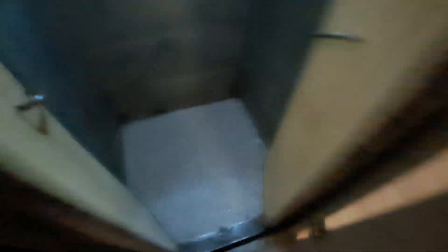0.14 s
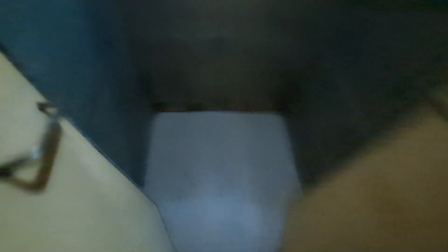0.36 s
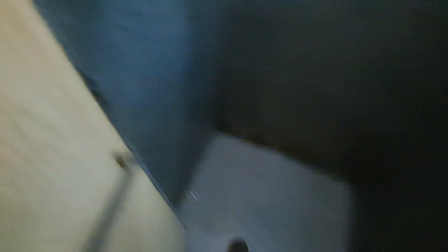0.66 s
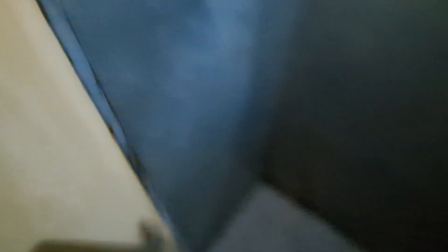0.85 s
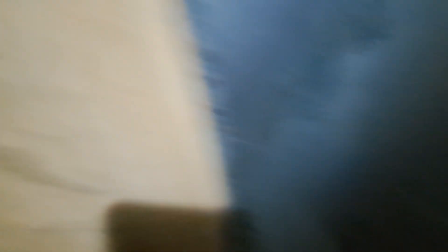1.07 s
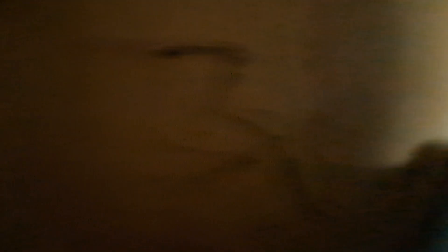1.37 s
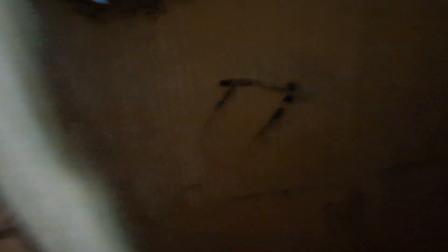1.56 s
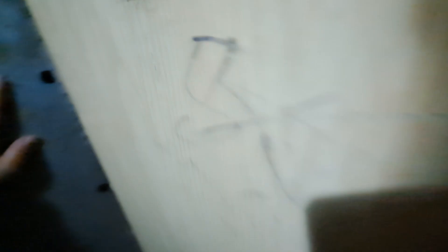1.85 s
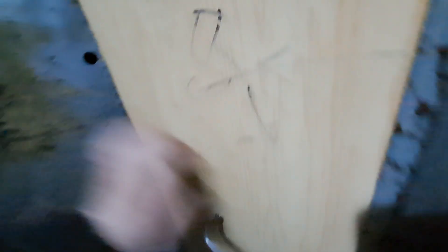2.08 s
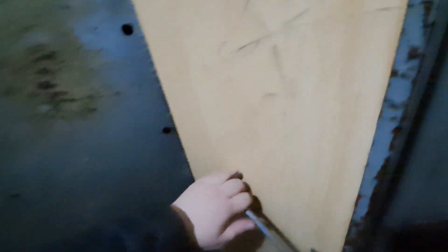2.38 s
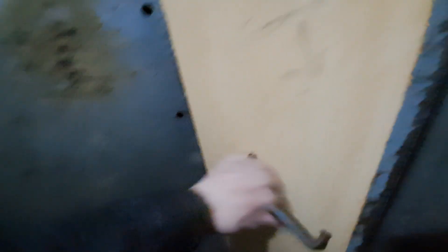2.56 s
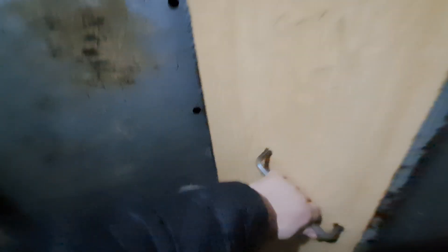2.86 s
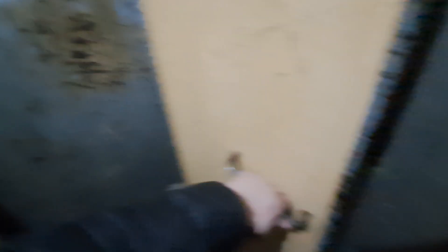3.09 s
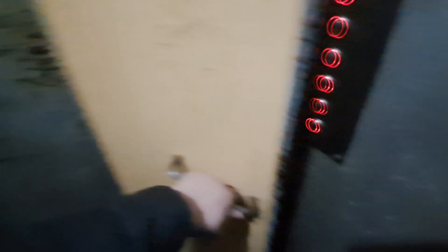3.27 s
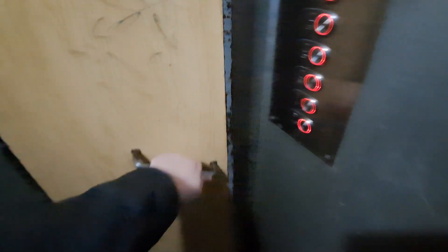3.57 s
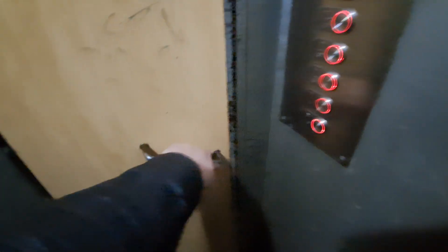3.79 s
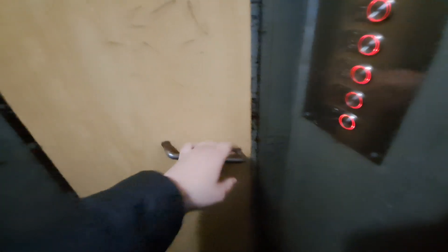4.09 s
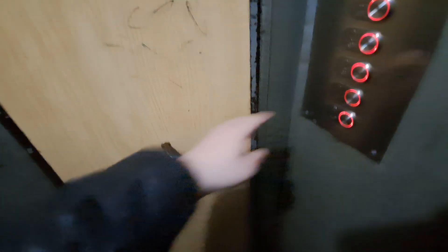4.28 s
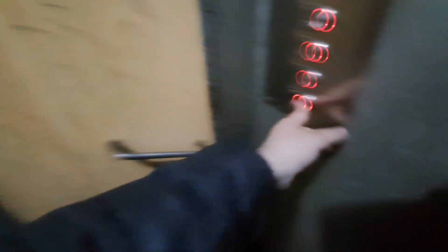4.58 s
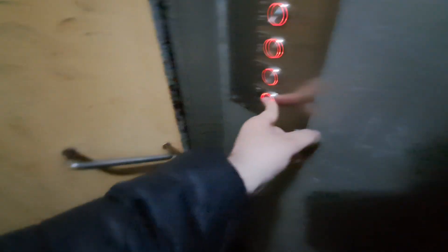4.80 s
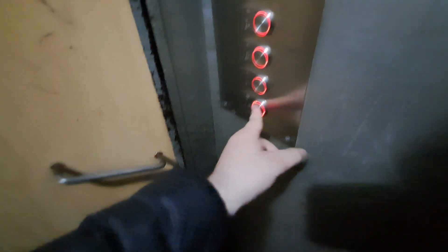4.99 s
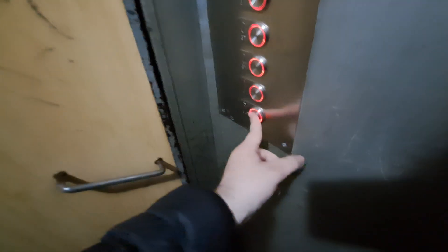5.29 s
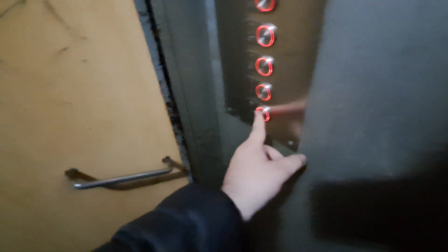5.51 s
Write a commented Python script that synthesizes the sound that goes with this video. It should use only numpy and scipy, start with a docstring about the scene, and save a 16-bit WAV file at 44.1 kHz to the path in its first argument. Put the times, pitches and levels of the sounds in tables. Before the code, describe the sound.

Manual lift doors being closed by hand, heard from within the boxy cabin. First a loud multiple-hit slam with steel clatter and low boom, a second later a hollow wooden thump with a loose latch, then handling knocks, a dry creaking hinge with piercing high squeaks, and a firmer knocky bang. It ends with faint brushing and tiny clicks, close to the microphone.

```python
"""Inside the small steel cabin of an old lift, the manual doors are shut by hand. A sleeve rustles, then the
heavy landing door slams: cabin and door modes boom, fittings rattle. The first wooden leaf bangs, deep and
hollow, and the latch rattles. The second squeaks and creaks on its hinge, drags and bangs. Last, a hand brushes
the button plate and a floor button clicks. Blows and contacts drive decaying noise bands and resonators; the
squeaks are unsteady sines."""
import sys
import numpy as np
from scipy import signal
from scipy.fft import rfft, irfft, next_fast_len
from scipy.io import wavfile
from scipy.ndimage import uniform_filter1d

SR = 44100
rng = np.random.default_rng(int(sys.argv[2]) if len(sys.argv) > 2 else 0)


def generate_wav(signal):
    """Clip the signal to [-1, 1] and save it as 16-bit WAV at the path in sys.argv[1]."""
    frames = np.transpose(np.atleast_2d(signal))
    scaled = np.clip(frames, -1, 1) * 32767
    pcm = np.round(scaled).astype(np.int16)
    wavfile.write(sys.argv[1], SR, pcm)


N = 249165
TIME_S = np.arange(N) / SR
BAND_EDGES_HZ = np.geomspace(28, 17000, 22)

# microphone pair: (frequency [Hz], left-right level [dB])
MIC_TILT = [(50, 15), (150, 24), (300, 3), (600, -1.5), (1200, -2.5), (2200, -11.5), (5000, -2.5),
            (10000, 1.5)]
# microphone pair: (frequency [Hz], left-right correlation [1])
MIC_LIKENESS = [(60, 1), (200, 0.88), (500, 0.55), (1000, 0)]
CUTOFF_HZ = 15850

# noise colour of cabin rumble, rubbing doors, sleeve: (frequency [Hz], relative level per band [dB])
RUMBLE_COLOUR = [(30, -17.5), (55, -2.5), (120, -14), (170, -4.5), (500, -8), (1000, -23), (3000, -38.5)]
RUB_COLOUR = [(200, -26), (600, -16.5), (2400, -4), (4000, -27), (9000, -35)]
RUSTLE_COLOUR = [(800, -21), (2500, 4.5), (6500, 3), (9000, -14.5), (13000, 17), (16000, -2.5)]
# door swung or leant on: (full speed from [s], hold [s], rubbing level [dB], cabin rumble level [dB])
SWINGS = [(0.0, 0.013, -50.5, -51.5), (0.36, 0.027, -44.5, -53.5), (0.73, 0.35, -40, -47),
          (1.151, 0.043, -56.5, -37.5), (1.79, .04, -40.5, -35.5), (2.72, 0.03, -48, -49),
          (3.121, 0.46, -57, -45.5), (3.40, 0.19, -46.5, -47)]
SWING_RISE_DB_PER_S, SWING_FALL_DB_PER_S = 87.5, 30.5
RUMBLE_RISE_DB_PER_S, RUMBLE_FALL_DB_PER_S = 40, 19
SHUDDER_DB, SHUDDER_T60_S = -20.5, 2.4   # level relative to the boom
# sleeve strokes as the arm moves: (full speed from [s], hold [s], level [dB])
STROKES = [(0.05, 0.22, -63.5), (0.35, 0.046, -55), (0.71, 0.21, -52), (1.26, 0.0383, -59),
           (1.65, 0.37, -63), (2.27, 0.18, -64), (2.73, 0.041, -61), (2.95, .75, -71), (4.53, 0.071, -69.5)]
STROKE_RISE_DB_PER_S, STROKE_FALL_DB_PER_S = 126, 68
# hand brushes and presses the button plate: (time [s], level [dB])
BRUSHES = [(4.64, -55), (4.797, -52.5), (5.0, -56.5), (5.09, -57), (5.29, -62.5), (5.431, -50.5),
           (5.6, -52.5)]
BRUSH_HOLD_S, BRUSH_RISE_DB_PER_S, BRUSH_FALL_DB_PER_S = 0.025, 378, 183

# light knocks on doors, handles and button: (time [s], hollow thud level [dB], click level [dB])
TOUCHES = [(0.3, -32.5, -55), (1.774, -40.5, -65), (2.216, -42.5, -53), (2.356, -42, -50),
           (2.524, -38, -68), (2.599, -42, -65.5), (2.855, -36, -64), (2.965, -47.5, -69),
           (4.215, -53, -59.5), (4.30, -50.5, -70)]
# floor button: (time [s], click level [dB])
BUTTON_CLICKS = [(4.788, -61), (4.987, -57.5), (5.274, -61), (5.415, -56)]
# colour of touch clicks and of thuds, the latter also for brushing: (frequency [Hz], level per band [dB])
TOUCH_CLICK_COLOUR = [(1000, -25), (3500, -46), (6000, -6), (8500, 3.5), (11000, 1), (16000, -5.5)]
TOUCH_THUD_COLOUR = [(40, -8.5), (170, -5.5), (500, -6), (1500, -11), (2800, -19.5), (4500, -29),
                     (16000, -43)]

# slips of the creaking hinge: (time [s], level [dB])
CREAKS = [(3.055, -44.5), (3.118, -48), (3.221, -39), (3.297, -38), (3.367, -39), (3.388, -42),
          (3.413, -40.5), (3.487, -40.5), (3.538, -38.5), (3.602, -44), (3.636, -38), (3.698, -49.5),
          (3.785, -49)]
# colour of a slip: (frequency [Hz], relative level per band [dB])
CREAK_COLOUR = [(100, -18), (450, -0.5), (1000, -4.5), (2400, -4.5), (7000, -12.5), (16000, -16)]
# leaf panel under light knocks and slips: (frequency [Hz], relative level [dB])
PANEL_MODES = [(440, 1), (550, -1), (745, -2.5), (930, -2.5), (1160, -1.5), (1680, -6.5), (2060, -5.5)]
SCRAPE_START_S, SCRAPE_LENGTH_S, SCRAPE_DB = 3.07, 0.64, -50.5

# first hinge squeak; levels before the cabin's energy-keeping reflections
LOW_START_S, LOW_SWELL_S, LOW_FADE_S = 3.032, 0.044, 0.062
LOW_HZ, LOW_SAG_HZ, LOW_DB, LOW_SWELL_DB, LOW_PAN_DB = 7340, 271, -29, 10, -5
# second squeak, successive hinge modes: (start [s], hold [s], pitch [Hz], level [dB], left-right level [dB])
SHRIEK_MODES = [(3.524, 0.028, 11205, -12, 8), (3.553, .043, 10830, -16.5, 2.5),
                (3.564, .014, 10280, -15.5, 4), (3.577, 0.034, 11255, -16, 3.5),
                (3.601, 0.019, 11685, -14.5, 3.5)]
HOP_FALL_DB_PER_S, LAST_FALL_DB_PER_S = 900.5, 245
SQUEAK_ATTACK_S = 0.0052

# steel fittings of the landing door: (frequency [Hz], relative level [dB])
FITTING_MODES = [(1010, -3.5), (1310, -3.5), (1583, 0.5), (2056, -2.5), (2584, -0.5), (3300, 3.5)]
CLATTER_START_S, CLATTER_LENGTH_S, CLATTER_DB = 0.862, 0.06, -30
# loose metal latch: (time [s], level [dB])
LATCH_CLACKS = [(0.3, -41), (1.871, -22.5), (1.929, -28), (2.04, -38), (3.963, -30), (4.166, -41.5)]
# latch resonances: (frequency [Hz], relative level [dB])
LATCH_MODES = [(1810, -4.5), (1975, 0.5), (2280, -2.5), (2760, -5)]
LATCH_MEAN_REBOUND_S = 0.011
# cycles to fall by 60 dB
FITTING_RING_CYCLES, LATCH_RING_CYCLES, PANEL_RING_CYCLES = 110, 120, 150

# door strikes its frame, rebounds, settles:
# (time [s], cabin boom [dB], thud [dB], knock [dB], edge crack [dB], left-right level [dB])
BLOWS = [ (0.004, -33.5, -48.5, -64, -64, -5), (0.828, -33, -35.5, -23.5, -43, -0.5),
         (0.854, -50.5, -50, -28.5, -24.5, -1), (0.860, -28, -28.5, -14, -24, 2),
         (0.912, -36, -31.5, -19.5, -42, -3), (0.941, -15, -20.5, -13.5, -41.5, -1),
         (0.964, -18.5, -22, -23.5, -53, -3), (1.844, -34.5, -14, -39.5, -48, -2.5),
         (1.871, -32, -11, -23.5, -29.5, 0), (1.900, -30, -11, -33, -65, -5),
         (2.003, -44, -22.5, -45.5, -75, -3), (2.038, -50, -33.5, -39.5, -47.5, 1),
         (2.056, -42, -20.5, -49.5, -83, -3), (2.084, -50, -28, -50.5, -86, -2),
         (3.826, -26, -22, -19.5, -31.5, 11.5), (3.850, -42, -20, -19.5, -37, -4.5),
         (3.963, -34, -27.5, -28.5, -41.5, -1.5), (4.166, -38.5, -41.5, -45, -61, -4.5)]
# landing door, first leaf, second leaf: (in use from [s], thud [Hz], knock [Hz], knock resonance [dB])
DOORS = [(0.0, 332, 1405, -0.5), (1.5, 184, 1945, 7.5), (3.0, 344, 1500, -1.5)]
# dense higher modes of doors and cabin: (frequency [Hz], relative level per band [dB])
DOOR_COLOUR = [(35, -18), (60, 0.5), (115, -15), (165, -9), (350, -4), (1100, -7), (1900, -4.5), (2800, -2),
               (4000, -6), (6000, -2.5), (9000, -7.5), (14000, 2)]
# their decay: (frequency [Hz], t60 [s])
DOOR_T60 = [(50, 0.44), (250, 0.53), (700, 0.27), (6000, 0.25), (14000, 0.219)]
# steel landing door booming with the cabin walls: (frequency [Hz], relative level [dB], t60 [s])
LANDING_MODES = [(49.65, -.5, 1.1), (76.9, -7, .8), (184, -6, 0.88), (252.5, -7, .9), (306.4, -8.5, .8),
                 (487.2, -12, 0.81), (1300, -12, .14)]
# first wooden leaf, deep and hollow: (frequency [Hz], relative level [dB], t60 [s])
FIRST_LEAF_MODES = [(168.1, 1, .27), (211.3, -6, .3), (294.2, -6, 0.56), (367.3, -3, 0.53),
                    (477, -14.5, .7), (665, -2.5, 0.33), (752.4, -2, .25)]
# second wooden leaf, higher knock: (frequency [Hz], relative level [dB], t60 [s])
SECOND_LEAF_MODES = [(62.1, 0.5, 1.04), (251, -4, 0.59), (294, -11, 0.69), (373, -9.5, 0.51),
                     (471, -7.5, 0.55), (569, -8.5, .4), (984, -2, .18), (1286, -6, 0.14),
                     (1560, -3, 0.073), (2074, -7.5, 0.22)]


def from_db(db):
    """Decibels to gain."""
    return 10 ** (np.asarray(db) / 20)


def at_hz(points, hz):
    """Read a spectrum on a log-frequency axis."""
    point_hz, value = np.transpose(points)
    return np.interp(np.log(hz), np.log(point_hz), value)


def rms_one(x):
    """Scale each channel to rms 1."""
    return x / np.sqrt(np.mean(x ** 2, axis=-1, keepdims=True) + 1e-20)


def pan(db):
    """Left and right gains of constant power."""
    pair = from_db(np.array([db, -db]) / 2)
    return pair / np.sqrt(np.mean(pair ** 2, axis=0))


def drift(rate_hz):
    """Random wander between unit-spread values drawn at rate_hz."""
    knots = rng.standard_normal(32768)
    return np.interp(TIME_S * rate_hz, np.arange(len(knots)), knots)


def clicks(times_s, heights):
    """Stereo impulses at the given times."""
    out = np.zeros((2, N))
    index = np.clip(np.round(times_s * SR).astype(int), 0, N - 1)
    out[:, index] = heights
    return out


def fading(power, t60_s):
    """Energy put into a body dies away by 60 dB in t60_s."""
    return signal.lfilter([1], [1, -10 ** (-6 / (t60_s * SR))], power + 1e-18)


def ring(push, hz, t60_s):
    """A two-pole resonator: a unit click starts a decaying sine of height 1."""
    radius = from_db(-60 / (t60_s * SR))
    angle = 2 * np.pi * hz / SR
    poles = [1, -2 * radius * np.cos(angle), radius * radius]
    return signal.lfilter([0, np.sin(angle)], poles, push + 1e-18)


def struck(times_s, db, modes, cycles, scatter_db=3.5, pan_db=2.0):
    """A small part rings; each contact favours other modes, and each microphone hears them differently."""
    out = 0
    chance = rng.standard_normal((len(times_s), len(modes), 2))
    for k, (hz, mode_db) in enumerate(modes):
        luck = chance[:, k].T
        sign = rng.choice([-1, 1], luck.shape)
        push = sign * from_db(db + mode_db + scatter_db * luck)
        side = pan(at_hz(MIC_TILT, hz) + pan_db)[:, None]
        out = out + ring(clicks(times_s, push), hz, cycles / hz) * side
    return out


def chatter(start_s, length_s, db, modes, cycles, pan_db, count):
    """A run of uneven contacts that swells and ebbs."""
    progress = (np.arange(count) + rng.random(count)) / count
    swell_db = 10 * np.log10(np.sin(np.pi * progress) + 1e-9)
    return struck(start_s + length_s * progress, db + swell_db, modes, cycles, pan_db=pan_db)


def envelope(start_s, hold_s, rise_db_per_s, fall_db_per_s):
    """Gain that rises to 1 at the start, holds, then falls."""
    before_s = np.maximum(start_s - TIME_S, 0)
    after_s = np.maximum(TIME_S - start_s - hold_s, 0)
    return from_db(-rise_db_per_s * before_s - fall_db_per_s * after_s)


def gestures(rows, rise_db_per_s, fall_db_per_s):
    """Power-summed gain of overlapping movements, rows of (start [s], hold [s], level [dB])."""
    power = 0
    for start_s, hold_s, db in rows:
        power = power + (from_db(db) * envelope(start_s, hold_s, rise_db_per_s, fall_db_per_s)) ** 2
    return np.sqrt(power)


def noise_bands(ripple_db=2.5, spacing_hz=55):
    """Yield (centre [Hz], stereo noise), rippled by close-set panel modes, slow swells evened out."""
    size = next_fast_len(N)
    bins_hz = np.arange(size // 2 + 1) * SR / size
    ripple = np.interp(bins_hz / spacing_hz, np.arange(1024), rng.standard_normal(1024))
    spectrum = rfft(rng.standard_normal((2, 2, size))) * from_db(ripple_db * ripple)
    noise = irfft(spectrum, size)[..., :N]
    for k, (low, high) in enumerate(zip(BAND_EDGES_HZ, BAND_EDGES_HZ[1:])):
        band = signal.butter(2, [low, high], "band", fs=SR, output="sos")
        mid, side = signal.sosfilt(band, noise[k % 2])   # neighbours use separate noise
        hz = np.sqrt(low * high)
        alike = np.clip(at_hz(MIC_LIKENESS, hz), -0.99, 0.99)
        pair = np.sqrt(1 + alike) * mid + np.sqrt(1 - alike) * side * [[1], [-1]]
        span = int(SR * max(0.012, 2 / (high - low)))
        yield hz, pair / np.sqrt(uniform_filter1d(pair ** 2, span) + 1e-12)


def cabin(x, wet_db, t60_s=0.18):
    """Dense reflections between close walls, different at each microphone; the energy is kept."""
    t = TIME_S[:SR // 2]
    echoes = rng.standard_normal((2, len(t))) * from_db(-60 * t / t60_s) * (t > 0.003)
    echoes *= from_db(wet_db) / np.sqrt(np.sum(echoes ** 2, axis=1, keepdims=True))
    wet = signal.fftconvolve(x[None], echoes, axes=1)[:, :N]
    return rms_one(x + wet) * np.std(x)


def rumble_gain(shudder_hz=90):
    """Swings rumble the cabin; after each blow it shudders on its ropes."""
    start_s, hold_s, _, rumble_db = np.transpose(SWINGS)
    swings = gestures(zip(start_s, hold_s, rumble_db), RUMBLE_RISE_DB_PER_S, RUMBLE_FALL_DB_PER_S)
    times_s, strength = blow_strength(shudder_hz)
    energy = (strength * from_db(SHUDDER_DB)) ** 2
    shudder = fading(clicks(times_s, energy).mean(axis=0), SHUDDER_T60_S)
    return np.sqrt(swings ** 2 + shudder)


def rub_gain():
    """The doors rub as they swing."""
    start_s, hold_s, rub_db, _ = np.transpose(SWINGS)
    return gestures(zip(start_s, hold_s, rub_db), SWING_RISE_DB_PER_S, SWING_FALL_DB_PER_S)


def rustle_gain():
    """The sleeve rustles with each stroke of the arm."""
    return gestures(STROKES, STROKE_RISE_DB_PER_S, STROKE_FALL_DB_PER_S)


def brush_gain():
    """The hand brushes the button plate in short strokes."""
    rows = [(time_s, BRUSH_HOLD_S, db) for time_s, db in BRUSHES]
    return gestures(rows, BRUSH_RISE_DB_PER_S, BRUSH_FALL_DB_PER_S)


def movement(hz, gains, grain_db=2.5):
    """Power in one band of rumble, rubbing, rustle and brushing, with a random grain."""
    colours = (RUMBLE_COLOUR, RUB_COLOUR, RUSTLE_COLOUR, TOUCH_THUD_COLOUR)
    power = sum((gain * from_db(at_hz(colour, hz))) ** 2 for gain, colour in zip(gains, colours))
    grain = from_db(grain_db * drift(90))
    return power * (grain * pan(at_hz(MIC_TILT, hz))[:, None]) ** 2


def small_contacts(hz, times_s, db, colour, t60_s, pan_db):
    """Power in one band from light contacts that ring briefly in the cabin."""
    power = clicks(times_s, from_db(db + at_hz(colour, hz)) ** 2)[0]
    return fading(power, t60_s) * pan(at_hz(MIC_TILT, hz) + pan_db)[:, None] ** 2


def touches(hz):
    """Each touch gives a hollow panel knock and a small bright click; the button only clicks."""
    touch_s, thud_db, touch_click_db = np.transpose(TOUCHES)
    thud_t60_s = 1.46 * at_hz(DOOR_T60, hz)
    thuds = small_contacts(hz, touch_s, thud_db, TOUCH_THUD_COLOUR, thud_t60_s, pan_db=2.5)
    click_s, click_db = np.r_[np.c_[touch_s, touch_click_db], BUTTON_CLICKS].T
    return thuds + small_contacts(hz, click_s, click_db, TOUCH_CLICK_COLOUR, t60_s=0.21, pan_db=7.0)


def creaks(hz):
    """The loaded hinge gives way in separate slips."""
    times_s, db = np.transpose(CREAKS)
    return small_contacts(hz, times_s, db, CREAK_COLOUR, t60_s=1.09 * at_hz(DOOR_T60, hz), pan_db=3.5)


def panel(touch_db=-5.0, creak_db=-4.0):
    """Touches and hinge slips sound the wooden panel."""
    touch_s, thud_db, _ = np.transpose(TOUCHES)
    slip_s, slip_db = np.transpose(CREAKS)
    times_s = np.r_[touch_s, slip_s]
    db = np.r_[thud_db + touch_db, slip_db + creak_db]
    return struck(times_s, db, PANEL_MODES, PANEL_RING_CYCLES)


def scrape():
    """The second leaf drags as it closes, and its panel groans."""
    return chatter(SCRAPE_START_S, SCRAPE_LENGTH_S, SCRAPE_DB, PANEL_MODES, PANEL_RING_CYCLES,
                   pan_db=1, count=36)


def squeak(hz, gain, jitter_hz, rasp_rad, flutter_rad, flutter_hz, octave_db):
    """The dry hinge sticks and slips at a high pitch; rasp and fluttering side tones grow with its strength."""
    pitch_hz = hz + jitter_hz * drift(900)
    flutter = flutter_rad * np.sin(2 * np.pi * flutter_hz * TIME_S)
    unrest = np.sqrt(gain / gain.max()) * (flutter + rasp_rad * drift(4200))
    phase = 2 * np.pi * np.cumsum(pitch_hz) / SR + unrest
    octave = from_db(octave_db) * np.sin(2 * phase) * (2 * np.max(hz) < SR / 2)   # none above Nyquist
    return np.sqrt(2) * gain * (np.sin(phase) + octave)


def sliding(start_s, length_s):
    """1 while the hinge slides, with a quick start and stop."""
    to_edge_s = np.minimum(TIME_S - start_s, start_s + length_s - TIME_S)
    return np.clip(to_edge_s / SQUEAK_ATTACK_S, 0, 1)


def low_squeak():
    """The load on the hinge rises and eases: the squeak grows louder and flatter, then recovers."""
    length_s = LOW_SWELL_S + LOW_FADE_S
    load = np.interp(TIME_S - LOW_START_S, [0, LOW_SWELL_S, length_s], [0, 1, 0])
    gain = from_db(LOW_DB + LOW_SWELL_DB * load) * sliding(LOW_START_S, length_s)
    tone = squeak(LOW_HZ - LOW_SAG_HZ * load ** 2, gain, jitter_hz=60.2, rasp_rad=0.021,
                  flutter_rad=0.15, flutter_hz=190.5, octave_db=-17.0)
    return cabin(tone, wet_db=-1.0) * pan(LOW_PAN_DB)[:, None]


def high_squeak():
    """A shriek: the hinge's modes speak in turn, overlap and beat; the last and highest fades slowest."""
    out = 0
    for k, (start_s, hold_s, hz, db, pan_db) in enumerate(SHRIEK_MODES):
        last = k == len(SHRIEK_MODES) - 1
        fall_db_per_s = LAST_FALL_DB_PER_S if last else HOP_FALL_DB_PER_S
        attack = np.clip((TIME_S - start_s) / SQUEAK_ATTACK_S, 0, 1)
        gain = from_db(db) * envelope(start_s, hold_s, 0, fall_db_per_s) * attack
        tone = squeak(hz, gain, jitter_hz=45, rasp_rad=0.28,
                      flutter_rad=0.3, flutter_hz=456.6, octave_db=-np.inf)
        out = out + cabin(tone, wet_db=-1.0, t60_s=0.11) * pan(pan_db)[:, None]
    return out


def clatter():
    """The landing door's steel fittings rattle as it slams."""
    return chatter(CLATTER_START_S, CLATTER_LENGTH_S, CLATTER_DB, FITTING_MODES, FITTING_RING_CYCLES,
                   pan_db=0, count=22)


def latch():
    """The latch is jolted, rebounds once and rings briefly."""
    times_s, db = np.transpose(LATCH_CLACKS)
    rebounds_s = times_s + LATCH_MEAN_REBOUND_S * (0.5 + rng.random(len(times_s)))
    return struck(np.r_[times_s, rebounds_s], np.r_[db, db], LATCH_MODES, LATCH_RING_CYCLES)


def blow_strength(hz, boom_hz=75, crack_hz=9000, valley_db=0.74, knock_octaves=0.28):
    """Times of the blows and how hard each drives the given frequency, left and right."""
    rows, doors, db = np.array(BLOWS), np.array(DOORS), []
    for time_s, boom, thud, knock, crack, _ in rows:
        _, thud_hz, knock_hz, resonance_db = doors[np.sum(doors[1:, 0] <= time_s)]
        # the further apart thud and knock lie, the deeper the valley between them
        valley = (thud + knock) / 2 - valley_db * np.log2(knock_hz / thud_hz) ** 2
        centres_hz = [boom_hz, thud_hz, np.sqrt(thud_hz * knock_hz), knock_hz, crack_hz]
        levels_db = [boom, thud, valley, knock, crack]
        resonance = resonance_db / (1 + (np.log2(hz / knock_hz) / knock_octaves) ** 2)
        db.append(resonance + np.interp(np.log(hz), np.log(centres_hz), levels_db))
    return rows[:, 0], from_db(db) * pan(at_hz(MIC_TILT, hz) + rows[:, -1])


def door_blows(hz, crack_db=-5.0, nearness=0.74, crack_t60_s=0.0098,
               shaft_db=-21.0, shaft_t60_s=1.66, shaft_hz=2500, rattle_db=2.0):
    """Power in one band: a brief crack, ringing panels that rattle, and a dull tail from the shaft."""
    times_s, strength = blow_strength(hz)
    energy = (strength * from_db(at_hz(DOOR_COLOUR, hz))) ** 2
    power = clicks(times_s, energy)
    # a blow near the left microphone brings more of its direct sound
    direct = from_db(crack_db + nearness * np.array(BLOWS)[:, -1]) ** 2
    crack = fading(clicks(times_s, energy * direct), crack_t60_s) * hz / (hz + 1000)
    rattle = from_db(rattle_db * drift(220)) ** 2
    panels = fading(power, at_hz(DOOR_T60, hz)) * rattle
    shaft = fading(power, shaft_t60_s) * from_db(shaft_db) ** 2 / (1 + (hz / shaft_hz) ** 2)
    return crack + panels + shaft


def door_modes(level_db=-1.0, scatter_db=2.5, waver_db=2.5):
    """Every blow rings the modes of its own door, each with a strength of its own; the ring wavers."""
    out = 0
    door_struck = np.searchsorted(np.array(DOORS)[1:, 0], np.array(BLOWS)[:, 0])
    for door, modes in enumerate((LANDING_MODES, FIRST_LEAF_MODES, SECOND_LEAF_MODES)):
        chance = rng.standard_normal((len(BLOWS), len(modes)))
        for k, (hz, db, t60_s) in enumerate(modes):
            times_s, strength = blow_strength(hz)
            mode_gain = from_db(db + level_db + scatter_db * chance[:, k])
            push = strength * (door_struck == door) * mode_gain
            waver = from_db(waver_db * drift(45))
            out = out + (-1) ** k * ring(clicks(times_s, push), hz, t60_s) * waver
    return out


def scene():
    """Blows, touches, creaks and movement share the cabin's dense modes; resonators and squeaks add on top."""
    gains = rumble_gain(), rub_gain(), rustle_gain(), brush_gain()
    out = door_modes() + clatter() + latch() + panel() + scrape()
    for hz, noise in noise_bands():
        power = movement(hz, gains) + touches(hz) + creaks(hz) + door_blows(hz)
        out = out + noise * np.sqrt(power)
    return out + low_squeak() + high_squeak()


def record(dry):
    """The deepest bass is lost and the top is cut steeply."""
    high_pass = signal.butter(2, 30, "high", fs=SR, output="sos")
    low_pass = signal.ellip(12, 0.2, 100, CUTOFF_HZ, fs=SR, output="sos")
    return signal.sosfilt(low_pass, signal.sosfilt(high_pass, dry))


dry = scene()
out = record(dry)
generate_wav(out)
```